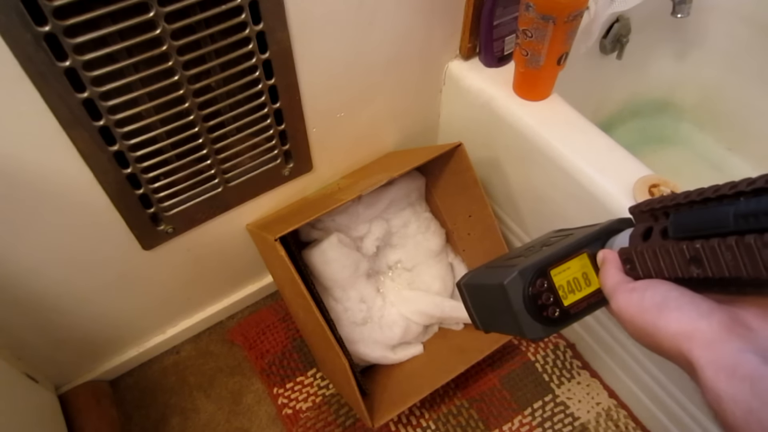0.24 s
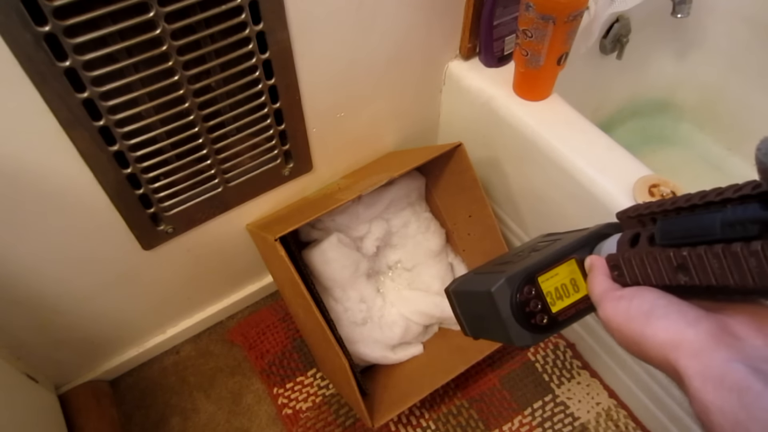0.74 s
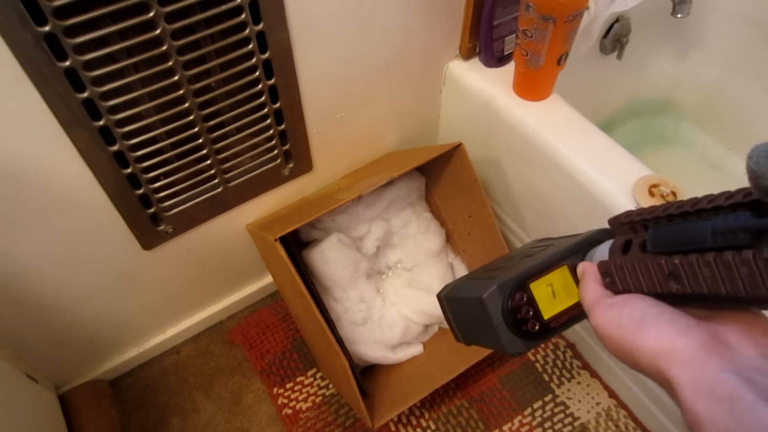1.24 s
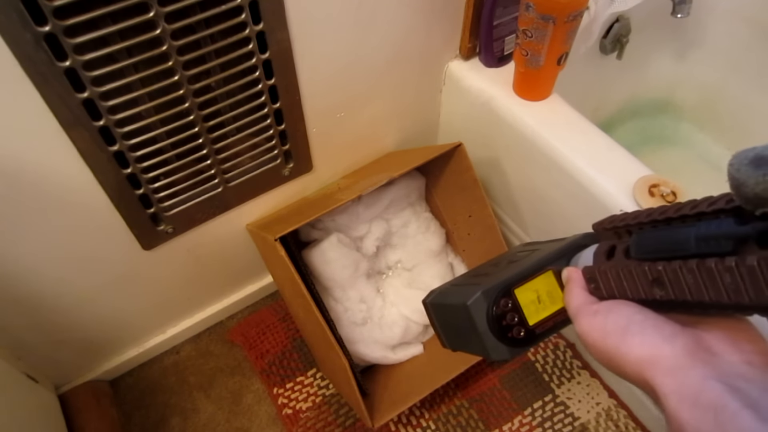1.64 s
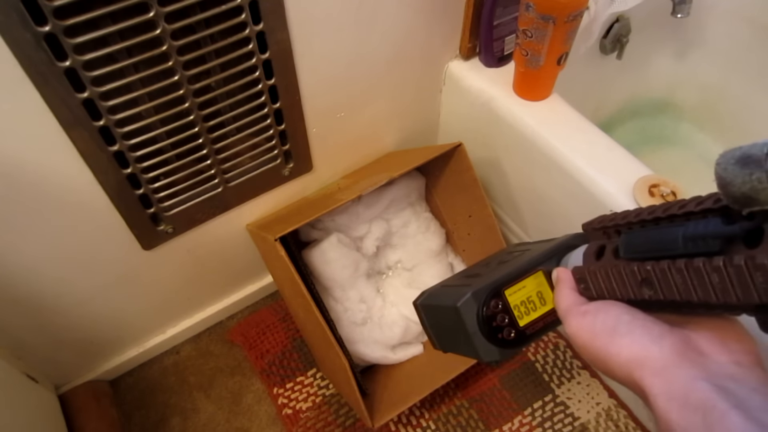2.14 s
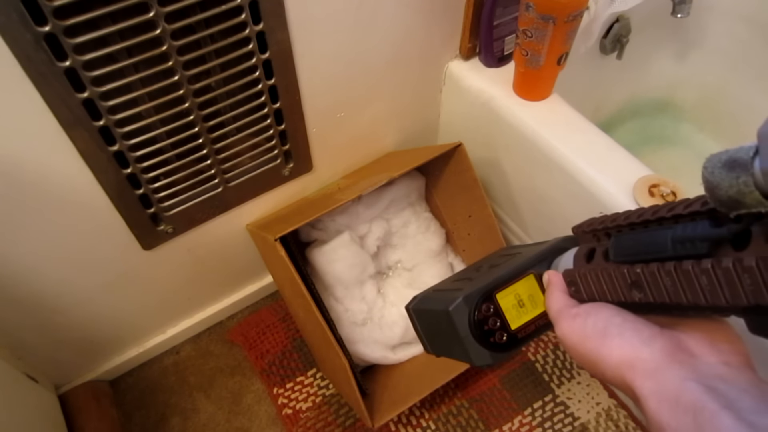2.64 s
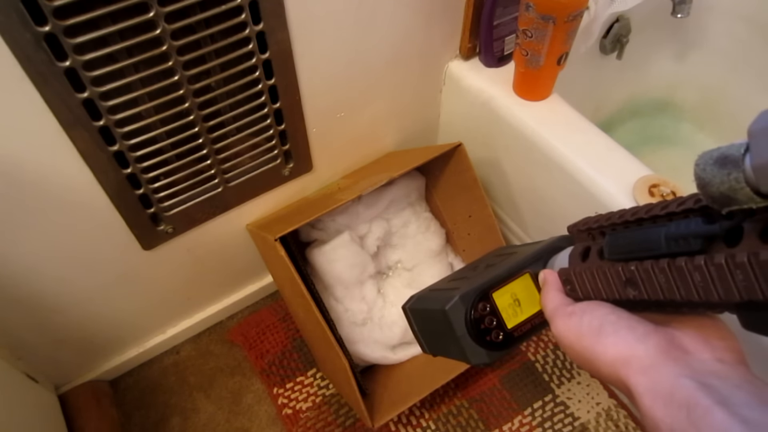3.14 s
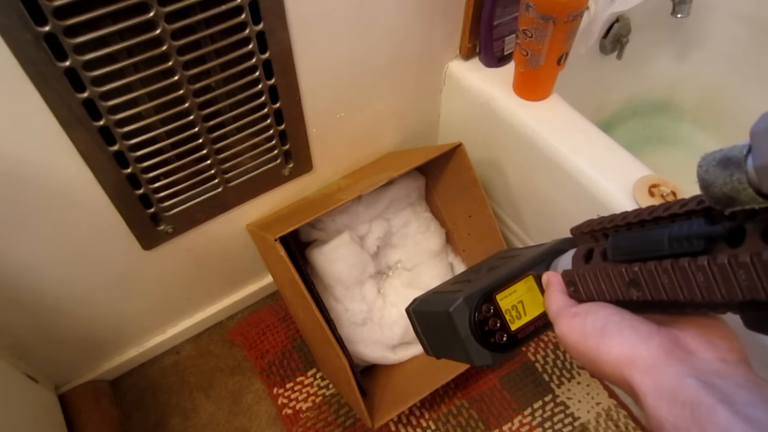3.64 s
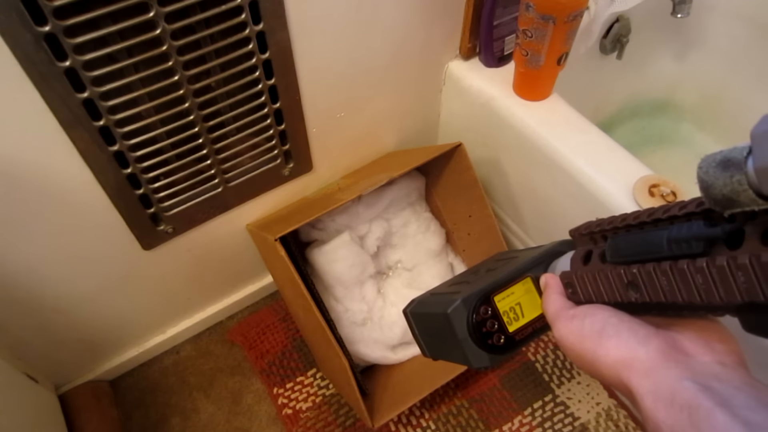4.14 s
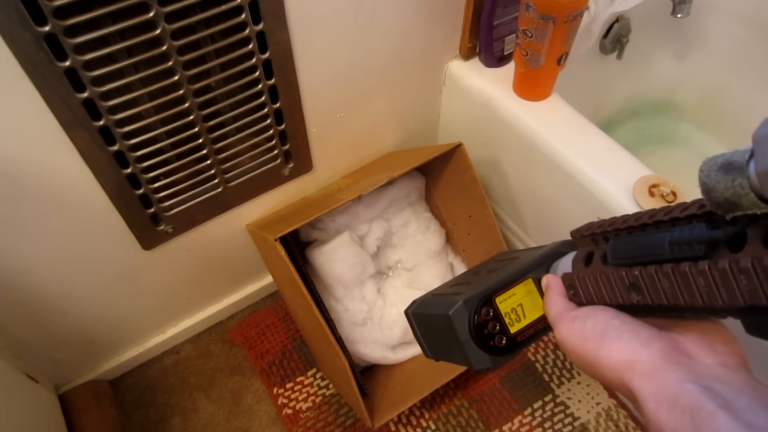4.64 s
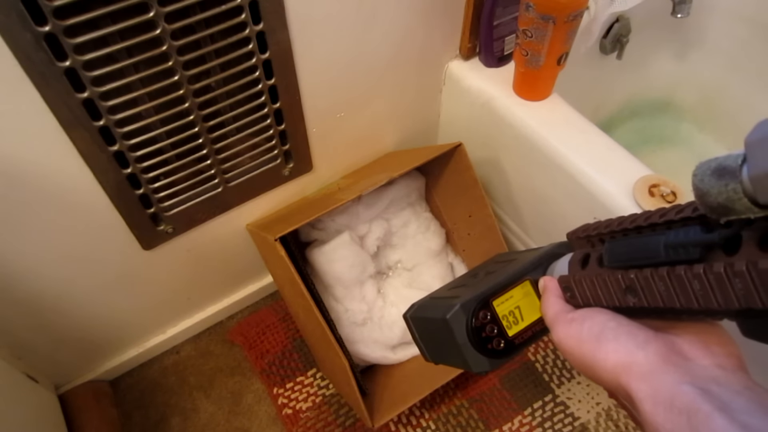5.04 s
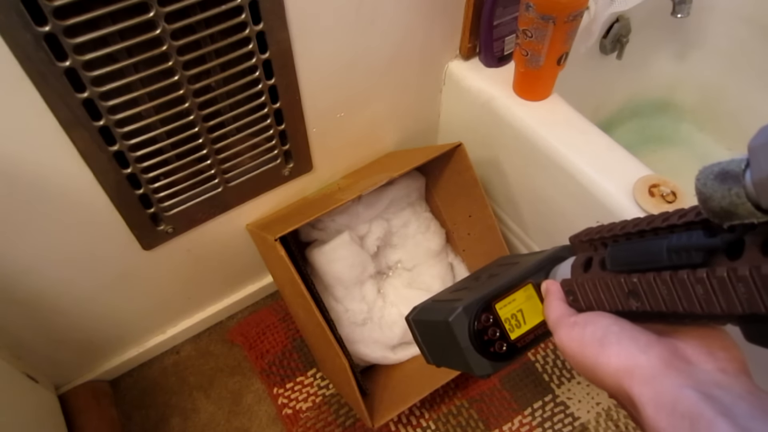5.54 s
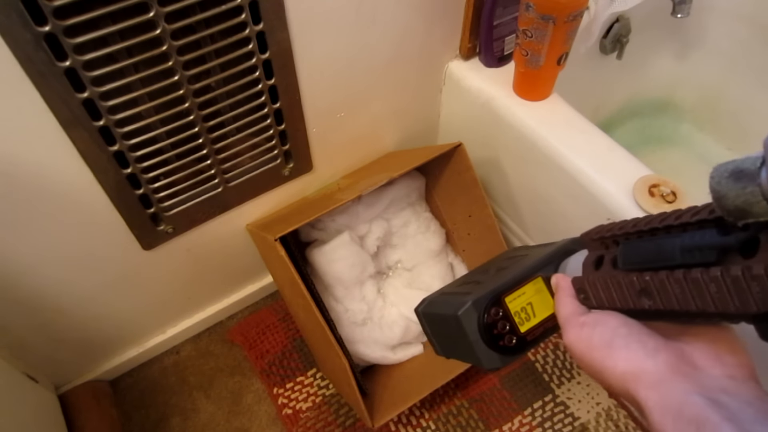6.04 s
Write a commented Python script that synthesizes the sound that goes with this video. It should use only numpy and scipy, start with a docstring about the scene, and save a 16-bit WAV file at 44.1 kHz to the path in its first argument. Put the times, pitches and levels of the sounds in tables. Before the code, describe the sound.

A faint, low, steady house hum sits in a small hard bathroom, with slight hiss. At about 0.1 s an electric airsoft rifle, very close, jolts and its gears whirr up gritty and fast for a twentieth of a second, ending in a sharp hollow crack at 0.15 s; the walls answer for about a third of a second. The same follows at 0.65 s. Plastic ticks at 0.95 s lead to a third shot at 1.07 s, narrower in tone with a pop of air just behind it. Faint finger shuffles come at 1.4-1.7 s, then another pellet shot at 2.57 s. The hum slowly swells through the pause. Open, empty-sounding cracks return at 4.0, 4.43, 4.77 and 5.1 s in quick succession, each with its whirr, and a last one at 5.69 s rings out into the ducked hum.

```python
"""A gear whirr rises out of a faint hum and ends in a sharp crack: an electric airsoft rifle in a small hard bathroom.
It fires nine times; two shots carry a pellet, which narrows the barrel ring and delays the pop of air.
Gears are jittered tooth impulses, cracks are impulses through resonances, the room is decaying noise and sines.
Gain control ducks at every crack and creeps back, lifting the hum."""
import sys
import numpy as np
from scipy import signal
from scipy.fft import rfft, irfft, next_fast_len
from scipy.io import wavfile
from scipy.ndimage import uniform_filter1d

SR = 44100
rng = np.random.default_rng(int(sys.argv[2]) if len(sys.argv) > 2 else 0)


def dump(signal):
    """Clip the signal to [-1, 1] and save it as 16-bit WAV at the path in sys.argv[1]."""
    limited = np.clip(np.atleast_2d(signal).T, -1, 1)
    pcm = np.round(limited * 32767).astype(np.int16)
    wavfile.write(sys.argv[1], SR, pcm)


N = 277830


def amp(db):
    """Gain of a level in dB."""
    return 10 ** (np.asarray(db) / 20)


def unit(x):
    """x at rms 1."""
    return x / np.sqrt(np.mean(x ** 2) + 1e-20)


def along(points, hz):
    """(Hz, value) points interpolated on a log frequency axis."""
    point_hz, value = np.transpose(points)
    return np.interp(np.log(hz + 1), np.log(point_hz + 1), value)


def filtered(x, response):
    """x times a complex response of frequency."""
    n = x.shape[-1]
    padded = next_fast_len(n + 8192)
    spectrum = rfft(x, padded) * response(np.fft.rfftfreq(padded, 1 / SR))
    return irfft(spectrum, padded)[..., :n]


def colour(spectrum):
    """Response that follows a (Hz, dB) table."""
    return lambda hz: amp(along(spectrum, hz))


def pulse(spectrum, size=2048):
    """Minimum-phase pulse with this spectrum, energy 1: cepstrum folded onto positive time."""
    level = amp(along(spectrum, np.fft.rfftfreq(size, 1 / SR)))
    cepstrum = irfft(np.log(level + 1e-6))
    cepstrum[1:size // 2] *= 2
    cepstrum[size // 2 + 1:] = 0
    p = irfft(np.exp(rfft(cepstrum)))
    return p / np.linalg.norm(p)


def resonances(modes):
    """Causal response of (Hz, width Hz, dB) resonances in alternating polarity."""
    def response(f):
        total = 0
        for k, (centre, width, db) in enumerate(modes):
            total = total + (-1) ** k * amp(db) * 1j * f * width / (centre ** 2 - f * f + 1j * f * width)
        return total
    return response


def train(rows, n):
    """Impulses at (delay ms, dB, sign), levels varied by 1 dB rms on each call."""
    blows = np.zeros(n)
    for ms, db, sign in rows:
        blows[round(abs(ms) * SR / 1000)] = sign * amp(db + rng.normal(0, 1))
    return blows


def spread(pair, alike):
    """Two unrelated sounds mixed to left and right of the given likeness."""
    def rotation(hz):
        angle = np.arccos(np.clip(along(alike, hz), -1, 1)) / 2
        return np.array([np.cos(angle), np.sin(angle)])
    mid, side = filtered(pair, rotation)
    return np.array([mid + side, mid - side])


def add(track, s, x):
    """Mix x into the track at s seconds."""
    i = round(s * SR)
    n = min(x.shape[-1], N - i)
    track[:, i:i + n] += x[..., :n]


# hum spectrum: hz, relative_db_per_hz
HUM_SPECTRUM = [(12, -33.5), (20, -6), (98, -2), (150, -2.5), (177, -13.5), (277, -2.5), (377, -5),
                (542, -3), (678, -7), (923, -6), (1190, -7.5), (2530, -18.5), (9400, -45), (10200, -49),
                (16000, -58.5)]
# hum stereo: hz, left_right_likeness (0..1)
HUM_LIKENESS = [(60, 0.018), (180, 1), (550, 0.19), (1650, 0.12), (4970, 0), (15000, 0.057)]


def hum():
    """Steady hum of the house: coloured noise, patchy by 1 dB rms over time and frequency."""
    z = signal.stft(rng.standard_normal((2, N)), nperseg=512)[2]
    patches_db = uniform_filter1d(rng.standard_normal(z.shape[1:]), size=5, axis=0)
    patches_db = unit(uniform_filter1d(patches_db, size=12, axis=1))
    pair = signal.istft(z * amp(patches_db), nperseg=512)[1][:, :N]
    return amp(-64.5) * unit(filtered(spread(pair, HUM_LIKENESS), colour(HUM_SPECTRUM)))


def whine():
    """Faint fuzzy high tone: noise through a narrow resonance."""
    noise = rng.standard_normal(N)
    return amp(-99.5) * unit(filtered(noise, resonances([(4640, 60, 0)])))


# handling ticks: start_s, level_db, body_db (body over level)
HANDLING = [(.950, -54, -3), (.9605, -52.5, 1), (1.4202, -70.5, 9), (1.4914, -72.5, 18.5),
            (1.6654, -70, 15), (1.6743, -69.5, 11), (1.696, -67, 10), (1.7126, -66, -5)]
# stereo of ticks, gears and snap: hz, left_right_likeness (0..1)
RIFLE_LIKENESS = [(200, 0.96), (2000, 1), (8000, 0.33)]


def ticks():
    """Fingers shift on the plastic housing: soft noise puffs, a bright part and a duller body."""
    out, t = np.zeros((2, N)), np.arange(SR // 8) / SR
    bright = pulse([(1200, -30.0), (2500, 5), (7000, -2.0), (9500, -23.5), (12000, -71.0)])
    body = pulse([(250, -28.0), (600, -1.5), (1500, -4.5), (3000, -27.5), (8000, -79.0)])
    decay = amp(-60 * t / .02) + 0.24 * amp(-60 * t / 0.257)
    rise = 1 - np.exp(-t / .0015)
    for s, db, body_db in HANDLING:
        puff = rng.standard_normal((3, len(t))) * decay * rise
        rustle = signal.fftconvolve(spread(puff[:2], RIFLE_LIKENESS), bright[None], axes=1)
        rustle = rustle + amp(body_db) * np.convolve(puff[2], body)
        add(out, s, amp(db) * rustle)
    return out


# room decay: hz, t60_s
ROOM_T60 = [(80, 0.11), (210, 0.38), (560, 0.39), (1470, 0.34), (3880, 0.38), (10200, 0.32)]
# room stereo: hz, left_right_likeness
ROOM_LIKENESS = [(60, 0.9), (180, 1), (550, 0.93), (1650, 0.35), (4970, 0.55), (15000, 0.18)]


def tail(seconds=.7):
    """Diffuse stereo answer of the walls: noise, each frequency dying at its own speed."""
    noise = rng.standard_normal((2, round(seconds * SR)))
    hz, t, z = signal.stft(noise, SR, nperseg=256)
    decay = amp(-60 * t / along(ROOM_T60, hz)[:, None])
    pair = signal.istft(z * decay, SR, nperseg=256)[1]
    return spread(pair / np.linalg.norm(pair[0]), ROOM_LIKENESS)


MESH_HZ, SPIN_UP_S = 3802, .028  # teeth a second at full motor speed; time constant of the run-up
RACK_HZ = 240  # mean rack teeth a second at full speed


def gear_knocks(t, speed):
    """Teeth knock at jittered motor speed; the sector gear catches the piston rack unevenly."""
    mesh_hz = MESH_HZ * speed * (1 + .45 * rng.standard_normal(len(t)))
    teeth = np.diff(np.floor(np.cumsum(mesh_hz) / SR), prepend=0)
    teeth = unit(teeth * amp(2.4 * rng.standard_normal(len(t))))
    knocks = [[1.3], [0]] * teeth + 1.8 * rng.standard_normal((2, len(t)))
    pace = rng.exponential(size=len(t) // 64 + 1).repeat(64)[:len(t)]
    rack = np.diff(np.floor(np.cumsum(RACK_HZ * speed * pace) / SR), prepend=0)
    rack = rack * amp(3 * rng.standard_normal(len(t)))
    catches = np.convolve(rack, amp(-60 * t[:400] / .012))[:len(t)]
    return knocks * (1 + .8 * catches)


def jolt(t):
    """Slack taken up: one short coloured noise burst."""
    burst = rng.standard_normal(len(t)) * amp(-60 * t / 0.045) * (1 - np.exp(-t / 0.0019))
    shape = pulse([(200, -24.0), (700, 1.5), (3000, -14.5), (9000, -31), (12000, -59.0)])
    return np.convolve(burst, shape)[:len(t)]


# trigger pulls: start_s, gear_db (before load), jolt_db
TRIGGER_PULLS = [(.098, -25, -29.5), (.594, -27.5, -40), (1.014, -28.5, -42.5), (2.5108, -28, -34.5),
                 (3.943, -27.5, -23.5), (4.368, -31.5, -40), (4.712, -32, -27.5), (5.043, -31, -36.5),
                 (5.638, -28, -36)]
# tooth knock spectrum: hz, relative_db_per_hz
TOOTH = [(59, -59.5), (100, -30), (461, -7.5), (608, -4), (721, -1.5), (1230, -4.5), (2040, -2.5),
         (2470, -8.5), (2860, -5), (6700, -11.5), (9820, -26), (11900, -44), (16000, -36)]


def gears():
    """Motor speeds up: faster, louder, brighter knocks until the piston lets go, then a quick fade."""
    out, t = np.zeros((2, N)), np.arange(SR // 4) / SR
    tooth, walls = pulse(TOOTH), tail()
    speed = 1 - np.exp(-t / SPIN_UP_S)
    for (s, db, jolt_db), (shot_s, *_) in zip(TRIGGER_PULLS, SHOT_LIST):
        knocks = gear_knocks(t, speed)
        low = filtered(knocks, lambda hz: 1 / (1 + (hz / 2600) ** 4))
        high = filtered(knocks, lambda hz: 1 / (1 + (hz / 2600) ** -4))
        # +11 dB/s under load, then 60 dB down in 74 ms
        load = amp(11 * np.clip(t, 0, shot_s - s)) * amp(-60 * np.clip(t - (shot_s - s), 0, 1) / 0.074)
        pair = spread(low * speed ** .5 + high * speed ** 1.6, RIFLE_LIKENESS)
        whirr = unit(signal.fftconvolve(pair, tooth[None], axes=1)[:, :len(t)])
        whirr = amp(db) * load * whirr
        whirr += amp(jolt_db) * jolt(t)
        add(out, s, whirr)
        echo = signal.fftconvolve(whirr.mean(0)[None], walls, axes=1)
        add(out, s + .004, amp(-8.5) * echo)
    return out


# piston push spectrum: hz, relative_db_per_hz
PISTON_PUSH = [(20, -25), (60, -11.5), (200, 1.5), (450, -6.5), (900, -25.5), (3000, -66), (16000, -100)]


def piston_push():
    """The piston sets off: one low pulse of negative polarity."""
    return -pulse(PISTON_PUSH)


def soft_front():
    """Smoothing pulse of unit sum: blows of air have rounded fronts."""
    soft = pulse([(20, 1.5), (3000, 0.5), (6000, -10), (16000, -41.5)])
    return soft / soft.sum()


# barrel and housing: hz, width_hz, relative_db
OPEN_BARREL = [(522, 110, -21.5), (980, 72, -2.5), (1394.5, 120, -3), (1656, 110, 1), (2143, 130, -3),
               (2684, 70, -7)]


def nozzle_clack(n, soft):
    """An empty nozzle clacks home: one impulse rings barrel and housing."""
    blow = train([(0, 14.5, -0.4)], n)
    return np.convolve(filtered(blow, resonances(OPEN_BARREL)), soft)


# crack and its returns from box, floor and tub: delay_ms, relative_db, sign
CRACK_RETURNS = [(0, 1, -1), (1.6, 0, -1), (3.1, -5, 1), (5.9, -3, -1), (9.5, -11, 1), (12.5, -12, -1)]
# low part of the crack: hz, relative_db_per_hz
CRACK_THUMP = [(15, -45), (25, -30.5), (399, 6), (551, -0.5), (738, -3), (1000, 4.5), (1200, -1.5),
               (1560, -27), (2640, -120)]


def empty_crack(n, soft, ring_db, air_db):
    """Air cracks from an open barrel: blow and returns ring it, over a low thump."""
    blows = train(CRACK_RETURNS, n)
    ring = amp(ring_db) * filtered(blows, resonances(OPEN_BARREL))
    thump = amp(air_db) * np.convolve(blows, pulse(CRACK_THUMP))[:n]
    return np.convolve(ring + thump, soft)[:n]


# piston strike, rattle of the nozzle: delay_ms, relative_db, sign
STRIKE_AND_RATTLE = [(0, 1, -1), (1.8, -4, 1), (2.5, -4, -1), (3.1, -6, -1)]
# plugged barrel: hz, width_hz, relative_db
PLUGGED_BARREL = [(270, 88, -16.5), (1552, 93, 1), (2810, 120, -17.5), (3200, 78, -22)]
# pop and its returns: delay_ms, relative_db, sign
POP_RETURNS = [(11.5, -1, 1), (13.6, 0, -1), (21, -6, 1), (32, -6, -1)]
# muzzle pop: hz, width_hz, relative_db
MUZZLE_POP = [(260, 38, -8), (795, 430, 5.5), (1540, 300, -3)]


def loaded_crack(n, soft, ring_db, air_db):
    """The pellet plugs the barrel: a narrow ring first, air pops out as the pellet leaves."""
    ring = amp(ring_db) * filtered(train(STRIKE_AND_RATTLE, n), resonances(PLUGGED_BARREL))
    pop = amp(air_db) * filtered(train(POP_RETURNS, n), resonances(MUZZLE_POP))
    return np.convolve(ring + pop, soft)[:n]


# treble of the crack: hz, relative_db_per_hz
SNAP_SPECTRUM = [(1470, -32), (2700, -8.5), (3440, -17), (4800, -16.5), (5520, -8), (6300, -17.5),
                 (7360, -24), (10300, -31.5), (11600, -46.5), (12500, -40.5), (16000, -39)]


def treble_snap(n):
    """Treble of the crack: a coloured stereo noise burst, 60 dB down in 19 ms."""
    t = np.arange(n) / SR
    burst = rng.standard_normal((2, n)) * amp(-60 * t / 0.019) * (1 - np.exp(-t / 0.00051))
    pair = spread(burst, RIFLE_LIKENESS)
    return signal.fftconvolve(pair, pulse(SNAP_SPECTRUM)[None], axes=1)[:, :n]


# room's answer to an empty shot: hz, relative_db_per_hz
EMPTY_ECHO = [(35, -66), (60, -34.5), (281, -6.5), (480, -4), (732, -8.5), (1060, -6), (1250, -10),
              (1600, 0.96), (1860, -10), (2120, -3), (2410, -14.5), (2650, -12), (3850, -28.5), (5860, -23),
              (16000, -57.5)]
# room's answer to a loaded shot: hz, relative_db_per_hz
PELLET_ECHO = [(35, -64), (60, -26.5), (256, -6), (448, -12), (682, -1.5), (903, -5), (1060, -5),
               (1340, -6), (1740, 1.5), (2250, -18), (4320, -29), (5860, -26), (16000, -56)]


def wall_answer(loaded, shared):
    """Diffuse room answer, soft onset; about a third of the energy repeats between empty shots."""
    if loaded:
        walls = filtered(tail(), colour(PELLET_ECHO))
    else:
        # the rifle hardly moves
        walls = filtered(0.58 * shared + 0.83 * tail(), colour(EMPTY_ECHO))
    walls *= 1 - np.exp(-np.arange(walls.shape[1]) / SR / 0.0021)
    return walls / np.linalg.norm(walls[0])


# room modes: hz, relative_db, t60_s
STANDING_WAVES = [(216.4, -8, .33), (292, -14, 0.28), (362.7, -3, 0.39), (484, -9, .35), (982, -18, 0.64),
                  (1535, -12, 0.4), (1595, -13.5, 0.52), (1650, -14, 0.54), (1730, -13.5, .3)]


def room_ring(phases):
    """Room modes ring on: decaying sines, levels scattered by 1.5 dB rms per shot."""
    t = np.arange(SR) / SR
    scatter_db = 1.5 * rng.standard_normal(len(phases))
    ring = np.zeros(SR)
    for (hz, db, t60), phase, more_db in zip(STANDING_WAVES, phases, scatter_db):
        ring += amp(db + more_db - 60 * t / t60) * np.sin(2 * np.pi * hz * t + phase)
    return ring * (1 - np.exp(-t / 0.002))


LOADED = (2, 3)  # shots, counted from 0, that carry a pellet
PUSH_LEAD_S, NOZZLE_LEAD_S, WALLS_DELAY_S = .003, 0.0014, .003
SNAP_DELAY_S = (.0003, .002)  # empty, loaded
# layers over shot strength: ring_db, air_db, snap_db, walls_db, modes_db
EMPTY_LAYERS = (25.5, 5.5, -17, 9.5, -25)
# same columns, for a loaded shot
LOADED_LAYERS = (28.5, 11.5, -20, 8.5, -36.5)
# shots: start_s, strength_db, push_db (independent of strength)
SHOT_LIST = [(0.154, 0.5, -1), (0.6492, .5, -7.5), (1.0703, 1, -1.5), (2.5686, 0.5, -3), (3.9987, -.5, 0),
             (4.427, 0, -5.5), (4.7691, 1, -5.5), (5.0975, .5, -4.5), (5.6930, 1.5, -7)]


def shots():
    """The piston's push leads, the crack rings the barrel and returns off near surfaces, the room rings on."""
    out, n = np.zeros((2, N)), SR // 10
    shared, soft = tail(), soft_front()
    phases = rng.uniform(0, 2 * np.pi, len(STANDING_WAVES))
    for k, (s, db, push_db) in enumerate(SHOT_LIST):
        loaded = k in LOADED
        ring_db, air_db, snap_db, walls_db, modes_db = LOADED_LAYERS if loaded else EMPTY_LAYERS
        if loaded:
            crack = loaded_crack(n, soft, ring_db, air_db)
        else:
            crack = empty_crack(n, soft, ring_db, air_db)
            add(out, s - NOZZLE_LEAD_S, amp(db) * nozzle_clack(n, soft))
        add(out, s, amp(db) * crack)
        add(out, s + SNAP_DELAY_S[loaded], amp(db + snap_db) * treble_snap(n))
        add(out, s - PUSH_LEAD_S, amp(push_db) * piston_push())
        add(out, s + WALLS_DELAY_S, amp(db + walls_db) * wall_answer(loaded, shared))
        add(out, s, amp(db + modes_db) * room_ring(phases))
    return out


# left port is the more open one: hz, left_minus_right_db
PORT_BALANCE = [(60, -0.1), (180, -0.53), (550, -0.2), (1650, 4.5), (4970, 7), (15000, 6)]
# microphone housing with a notch: hz, gain_db
PORT_RESPONSE = [(20, -3.5), (10500, -3), (11800, -10.5), (13000, -1), (16000, 0.5)]


def scene():
    """All sources at the two microphone ports, over the hiss of the electronics."""
    air = hum() + whine() + ticks() + gears() + shots()
    hiss = amp(-103) * rng.standard_normal((2, N))

    def ports(hz):
        balance_db = np.outer([.5, -.5], along(PORT_BALANCE, hz))
        return amp(balance_db + along(PORT_RESPONSE, hz))
    return filtered(air, ports) + hiss


def record(dry, top_db=-17, attack=0.0012):
    """Gain drops fast to hold the level near top_db, climbs at steady dB/s; soft ceiling; band limit."""
    most_db, climb_db_per_s, ceiling, top_hz = 4, 5.5, .49, 16000
    t = np.arange(N) / SR
    # rms over the last 4 ms
    power = uniform_filter1d(np.mean(dry ** 2, 0), size=177, origin=88)
    level = np.sqrt(np.abs(power) + 1e-12)
    need_db = np.minimum(most_db, top_db - 20 * np.log10(level))
    climb_db = climb_db_per_s * t
    gain_db = np.minimum.accumulate(need_db - climb_db) + climb_db
    keep = np.exp(-1 / (abs(attack) * SR))  # attack in s
    x = dry * amp(signal.lfilter([1 - keep], [1, -keep], gain_db))
    x = x / (1 + np.abs(x / ceiling) ** 4) ** (1 / 4)
    return filtered(x, lambda hz: np.clip((top_hz - hz) / 400, 0, 1))


dry = scene()
out = record(dry)
dump(out)
```